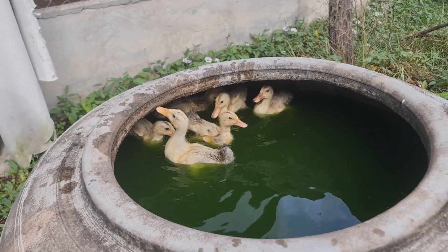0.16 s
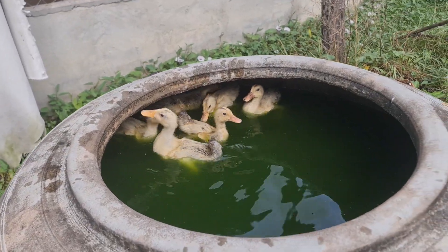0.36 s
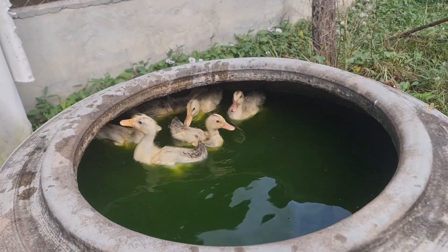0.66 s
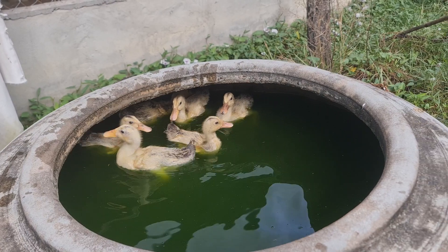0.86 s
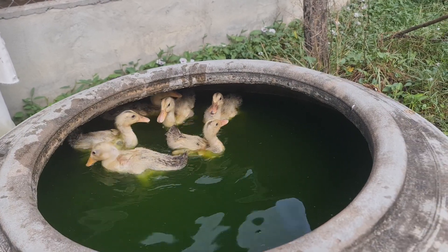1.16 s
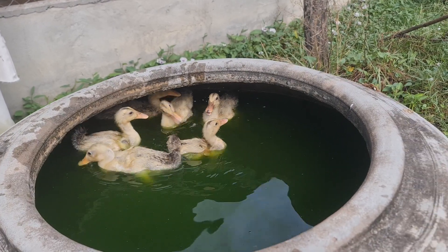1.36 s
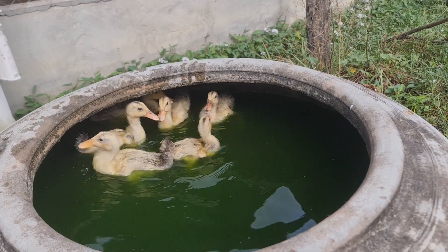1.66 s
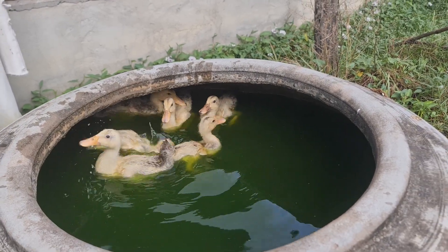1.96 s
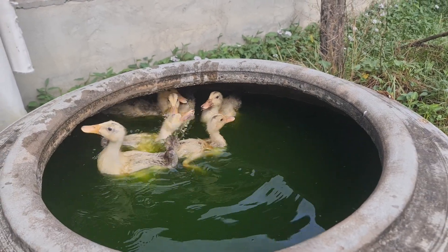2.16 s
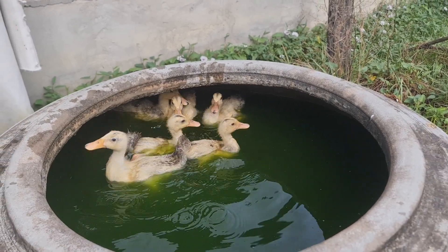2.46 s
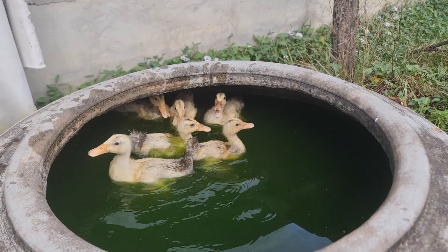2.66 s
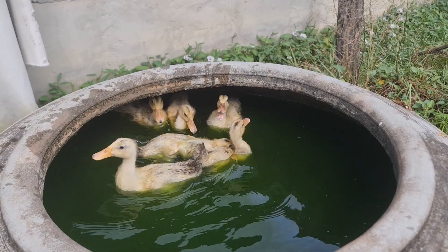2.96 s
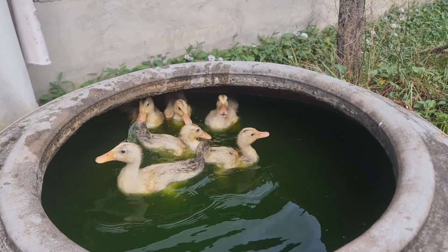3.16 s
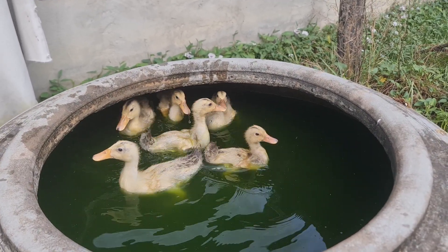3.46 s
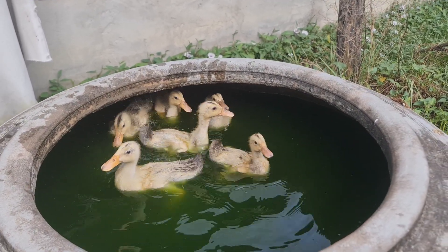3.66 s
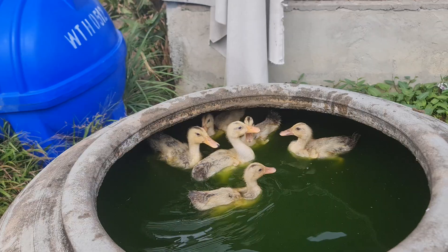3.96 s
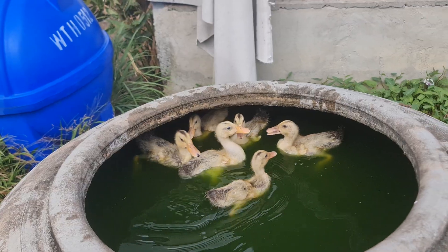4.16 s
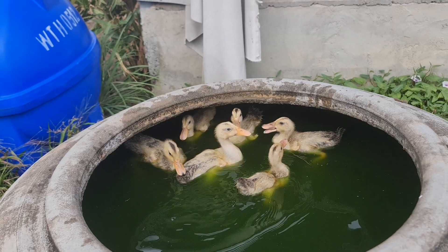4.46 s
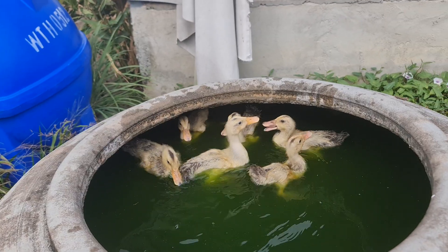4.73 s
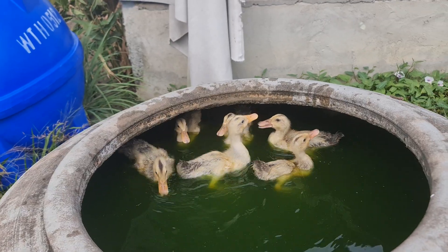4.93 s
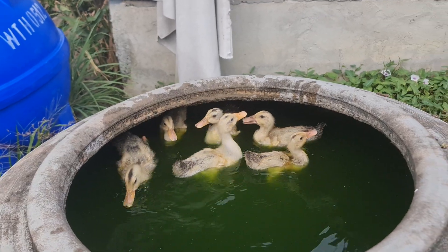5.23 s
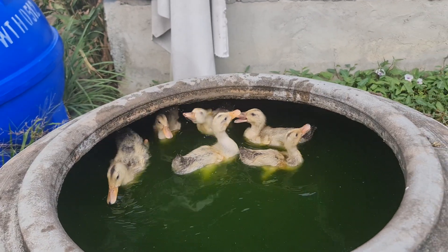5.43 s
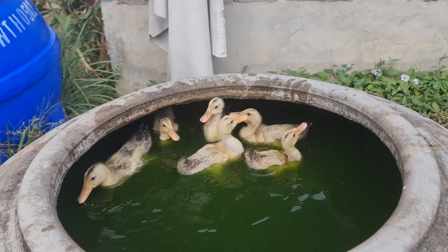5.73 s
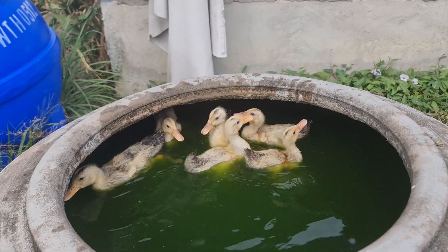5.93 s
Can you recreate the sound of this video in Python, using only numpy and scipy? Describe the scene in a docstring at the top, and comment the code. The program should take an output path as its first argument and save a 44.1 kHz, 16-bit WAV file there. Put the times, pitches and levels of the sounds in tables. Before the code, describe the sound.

Close in stereo, bright short duckling peeps repeat evenly, leaning left, with a short hollow echo from the jar. Small dabs, bubbles and splashes surround them over soft air, low rumble and a far engine. The peeps peak before a momentary silence near four seconds; afterwards they resume softer, answered by higher two-toned whistles, with one soft hollow knock near the end.

```python
"""A yard with a big water jar, its rim concrete: a duckling inside peeps about three times a second.
A second one joins in with two-voiced arching whistles; the others dabble, splash and knock close by.
Peeps are sine partials bent by membrane slips; water is noise bursts and ringing air; the jar is a decaying echo.
Far off, an engine hums and machines drone under coloured noise for the air, with two swells of hiss.
In the stereo microphone sound, everything drops out for a moment just before the fourth second."""
import sys
import numpy as np
from scipy import signal
from scipy.fft import rfft, irfft, next_fast_len
from scipy.io import wavfile
from scipy.ndimage import uniform_filter1d, minimum_filter1d, map_coordinates

SR = 44100
rng = np.random.default_rng(int(sys.argv[2]) if len(sys.argv) > 2 else 0)


def persist_wave(psi):
    """Save psi, clipped to +-1, as 16-bit WAV."""
    counts = np.round(np.clip(psi, -1, 1) * 32767).astype(np.int16)
    wavfile.write(sys.argv[1], SR, np.atleast_2d(counts).T)


N = 268569  # length in samples


def amp(db):
    """Decibels to gain."""
    return 10 ** (np.asarray(db) / 20)


def unit(x):
    """Scale to rms 1."""
    return x / np.sqrt(np.mean(x ** 2) + 1e-20)


def along(points, hz):
    """Read (f/Hz, value) points on a log frequency axis."""
    f, v = np.transpose(points)
    return np.interp(np.log(hz + 1), np.log(f + 1), v)


def curves(rows, t):
    """Each column after the time, read at the times t."""
    s, *cols = np.transpose(rows)
    return [np.interp(t, s, c) for c in cols]


def clock(seconds):
    """Sample times from zero."""
    return np.arange(int(seconds * SR)) / SR


def ramp(t, start, length):
    """Rise from 0 to 1 over length seconds from start."""
    return np.clip((t - start) / length, 0, 1)


def wobble(t, rate):
    """A smooth random curve, rate knots a second."""
    u = (t - t[0]) * rate
    return map_coordinates(rng.standard_normal(int(u[-1]) + 4), [u])


def filtered(x, response):
    """Apply a gain that depends on frequency."""
    n = x.shape[-1]
    m = next_fast_len(n + 8192)
    return irfft(rfft(x, m) * response(np.fft.rfftfreq(m, 1 / SR)), m)[..., :n]


def cycle(hz):
    """Running phase of a pitch curve, in radians."""
    return 2 * np.pi * np.cumsum(hz) / SR


def sides(pan_db):
    """Left and right gains of equal total power, pan_db apart."""
    return unit(amp([[pan_db / 2], [-pan_db / 2]]))


def add(out, s, x):
    """Mix x into out from time s."""
    i = max(round(s * SR), 0)
    out[:, i:i + x.shape[-1]] += x[..., :N - i]


# Likeness of the left and right microphones: f/Hz, correlation from -1 to 1
STEREO_LIKENESS = [(60, 0.98), (180, 0.94), (550, -0.17), (1650, -0.26), (4970, -0.012), (15000, -0.16)]


def noise(spectrum, size):
    """Coloured stereo noise of rms 1; mid and side shares set how alike the two channels are."""
    def colour(hz):
        turn = np.arccos(np.clip(along(STEREO_LIKENESS, hz), -1, 1)) / 2
        return amp(along(spectrum, hz)) * np.array([np.cos(turn), np.sin(turn)])

    mid, side = filtered(rng.standard_normal((2, size)), colour)
    return unit(np.array([mid + side, mid - side]))


# Faint drone of distant machinery: f/Hz, level/dB
MACHINE_TONES = [(335, -82.5), (405, -75.5), (498, -79.5), (592, -72), (856, -86)]


def drone():
    """Thin machine tones from far away, unsteady in pitch and level."""
    t = np.arange(N) / SR
    out = 0
    for hz, db in MACHINE_TONES:
        tone = np.sin(cycle(hz + 14 * wobble(t, 67)))
        out = out + amp(db + 1.3 * wobble(t, 2.7)) * tone
    return out


SWELL_SHAPE = 1.2  # 1 is a pointed swell, 2 a round one


def swell(t, peak, width):
    """A gain that rises to 1 at peak and falls again."""
    return np.exp(-np.abs((t - peak) / width) ** SWELL_SHAPE)


# The far engine's firing rate: t/s, f/Hz
ENGINE_FIRING = [(0, 85), (.5, 82), (2.8, 81.8), (4.15, 80.5), (4.5, 82.6), (5.6, 81.8), (6, 78.5)]
# Swells of its hum, before a common trim: peak t/s, half width t/s, level/dB
ENGINE_SWELLS = [(.53, 0.057, -32), (.97, 0.062, -33), (2.79, 0.05, -29.5), (4.18, 0.045, -28),
                 (4.32, 0.16, -32), (4.662, 0.14, -35), (5.21, 0.21, -33), (6.01, .045, -28)]
IDLE_DB = -57  # the hum between swells, before the same trim
# Bed of the yard, before trims: t/s, rumble level/dB, air level/dB
YARD_LEVELS = [(0.0, -49, -64.5), (0.2, -52.5, -66.5), (1.0, -44, -66.5), (1.63, -47.5, -68),
               (2.61, -48.5, -66.5), (2.95, -44.5, -64), (3.88, -49, -68), (4.04, -43.5, -58.5),
               (4.22, -44.5, -57.5), (4.49, -45.5, -65), (4.94, -52, -60.5), (5.17, -45.5, -60.5),
               (5.6, -48.5, -64.5), (6.09, -40.5, -61)]
RUMBLE_DB, AIR_DB = 0, 6.5  # trims on those two levels
# Colour of the low rumble: f/Hz, relative level/dB per Hz
RUMBLE_COLOUR = [(13, -55), (22, -24.5), (41, -3), (75, 5), (92, -5.5), (108, 0), (140, -8), (172, -26.5),
                 (260, -34.5), (340, -58.5), (570, -120)]
# Colour of the open air: f/Hz, relative level/dB per Hz
AIR_COLOUR = [(110, -27.5), (180, 0), (247, -6.5), (379, -9), (440, -6), (878, -10.5), (1750, -16.5),
              (2450, -14.5), (2790, -13), (3180, -16.5), (4200, -16.5), (5260, -23), (9370, -31.5),
              (11100, -20.5), (15500, -48.5)]
# Swells of hiss: peak t/s, half width t/s, body level/dB, fizz level/dB
HISS_SWELLS = [(1.15, .1, -56.5, -53), (4.238, 0.11, -36.5, -58)]
# Colour of the hiss body: f/Hz, relative level/dB per Hz
HISS_BODY_COLOUR = [(150, -24.5), (400, 11), (1000, -9), (3000, 13), (5000, 0.5), (7500, -12.5),
                    (9500, -25.5), (12000, -7.5), (15500, -21.5)]
# Colour of the high, thin part of the hiss: f/Hz, relative level/dB per Hz
FIZZ_COLOUR = [(2000, -11), (5500, 3.5), (8000, -1), (9700, -9.5), (12000, 0), (15500, -10.5)]
HISS_GRAIN_DB = 2.5  # graininess of the hiss body


def yard():
    """A far engine's hum as a wavering sine at its firing rate; rumble, air and hiss as coloured noise."""
    t = np.arange(N) / SR
    hum_hz, = curves(ENGINE_FIRING, t)
    load = amp(IDLE_DB) + sum(amp(db) * swell(t, s, width) for s, width, db in ENGINE_SWELLS)
    hum = load * amp(-2.0 + wobble(t, 23)) * np.sin(cycle(hum_hz + 1.5 * wobble(t, 22)))
    rumble_db, air_db = curves(YARD_LEVELS, t)
    rumble = amp(rumble_db + RUMBLE_DB + wobble(t, 6.2)) * noise(RUMBLE_COLOUR, N)
    air = amp(air_db + AIR_DB + 1.2 * wobble(t, 15)) * noise(AIR_COLOUR, N)
    body = amp(HISS_GRAIN_DB * wobble(t, 180)) * noise(HISS_BODY_COLOUR, N)
    fizz = noise(FIZZ_COLOUR, N)
    hiss = 0
    for s, width, body_db, fizz_db in HISS_SWELLS:
        hiss = hiss + swell(t, s, width) * (amp(body_db) * body + amp(fizz_db) * fizz)
    return (hum + rumble + air + hiss) * sides(-1.8)


# Faint chirps from farther off: start t/s, length t/s, from f/Hz, to f/Hz, level/dB
FAR_CHIRPS = [(0.016, 0.57, 4630, 3460, -69), (0.222, 0.11, 3160, 2610, -59.5),
              (.45, 0.25, 3170, 2730, -62), (0.502, 0.16, 4680, 4200, -69), (0.939, .08, 3960, 4180, -53.5),
              (5.27, 0.074, 4620, 4030, -53.5)]


def chirps():
    """Thin distant glides: single sines, shaky in pitch, fading in and out."""
    out = np.zeros((2, N))
    for s, length, from_hz, to_hz, db in FAR_CHIRPS:
        t = clock(length)
        hz = np.linspace(from_hz, to_hz, len(t)) + 130 * wobble(t, 400)
        level = amp(db + 1.4 * wobble(t, 58)) * signal.windows.tukey(len(t), .5)
        add(out, s, level * np.sin(cycle(hz)))
    return out


def dabbling(count):
    """Paddling feet and bills scatter tiny bubbles, each a short sine rising in pitch."""
    out, t = np.zeros((2, N)), clock(0.036)
    for when, pitch, size, side in rng.random((count, 4)):
        hz = 1100 * 4.5 ** pitch
        level = amp(-59.0 + 9.5 * size ** 3) * np.exp(-t * hz / 6)  # higher bubbles die sooner
        bubble = level * np.sin(cycle(hz * (1 + 5 * t)))
        add(out, when * N / SR, bubble * sides(8 * side - 5))
    return out


KNOCK_S = 5.617
# Modes of a hollow knock: f/Hz, relative level/dB, t60/s
KNOCK_MODES = [(342, 2, 0.26), (497, 4, 0.14), (637, 4, 0.15), (684, -15, 0.26), (1400, -13, 0.049)]


def knock():
    """One soft hollow knock: a few modes ring and decay together."""
    out, t = np.zeros((2, N)), clock(.4)
    ring = sum(amp(db - 60 * t / t60) * np.sin(2 * np.pi * hz * t) for hz, db, t60 in KNOCK_MODES)
    add(out, KNOCK_S, amp(-38.0) * ring * (1 - np.exp(-t / 0.0017)) * sides(-3.0))
    return out


# Bill dabs and splashes, before trims: t/s, level/dB, low slap relative level/dB, t60/s
SPLASH_EVENTS = [(0.3316, -47, -17, 0.088), (0.4518, -50.5, 2, 0.07), (0.6459, -57.5, 14, 0.1),
                 (0.8485, -44.5, 3.5, 0.089), (0.9353, -56, 5, 0.13), (1.3018, -35, -18, 0.038),
                 (1.66, -46.5, -24, 0.037), (1.9989, -47, 8, 0.07), (2.277, -40.5, -21, 0.031),
                 (3.0898, -49.5, 3, 0.092), (3.1236, -23.5, 0.5, 0.11), (3.2118, -45, -13.5, 0.074),
                 (3.2319, -35, -10, 0.096), (3.763, -44.5, -16.5, 0.04), (4.6925, -39, -16, 0.046),
                 (5.216, -39, -44, 0.059)]
# Colour of the spray, also the breath in a peep: f/Hz, relative level/dB per Hz
SPRAY_COLOUR = [(1200, -27), (2500, -1.5), (4400, 0.5), (6500, -10), (9500, -27), (15000, -24.5)]
# Colour of the low slap: f/Hz, relative level/dB per Hz
SLAP_COLOUR = [(300, -19), (750, 0.5), (1300, 2), (2000, -2), (4000, -33.5)]
# Air pockets in the water: t/s, starting f/Hz, level/dB, t60/s, pitch rise as a share per second
AIR_POCKETS = [(0.276, 336, -50.5, 0.14, 1), (2.002, 700, -35, 0.086, 4), (2.006, 1162, -38, 0.057, 1.5),
               (2.077, 583, -30, 0.12, 3), (2.078, 1110, -31.5, 0.023, 0), (2.129, 1207, -33.5, .045, 16.5),
               (3.131, 1345, -21.5, 0.042, 3.5), (3.125, 757, -34.5, 0.059, 4)]


def water():
    """Splashes are a slap under grainy spray; trapped air rings at a steady or rising pitch."""
    out, t = np.zeros((2, N)), clock(0.19)
    for s, db, slap_db, t60 in SPLASH_EVENTS:
        burst = amp(-4.0) * noise(SPRAY_COLOUR, len(t)) + amp(slap_db - 5) * noise(SLAP_COLOUR, len(t))
        decay = amp(db - 60 * t / t60 + 4.3 * wobble(t, 600))
        add(out, s - .002, burst * decay * (1 - np.exp(-t / 0.00077)))
    for s, hz, db, t60, rise in AIR_POCKETS:
        level = amp(db - 60 * t / t60) * (1 - np.exp(-t / 0.0018))
        add(out, s, level * np.sin(cycle(hz * (1 + rise * t))) * sides(-6))
    return out


# The second duckling, before trims: start t/s, length t/s,
# lower voice from f/Hz, to f/Hz, upper voice from f/Hz, to f/Hz, level/dB
WHISTLE_NOTES = [(4.296, .055, 2870, 3105, 2976, 3130, -31), (4.821, 0.097, 3100, 2920, 3770, 3720, -33.5),
                 (5.067, 0.098, 3750, 3610, 4210, 4060, -29), (5.438, 0.15, 3195, 3786, 3830, 4430, -28.5),
                 (5.784, 0.146, 3390, 4170, 4135, 4550, -30)]
WHISTLE_ENTRY_HZ, WHISTLE_SETTLE_S = 544, 0.0117  # a whistle dips onto its glide from above
WHISTLE_ATTACK_S, WHISTLE_ONSET_DB, WHISTLE_FADE_DB = 0.034, -13, -5.5
# every whistle plunges towards the same two pitches
WHISTLE_DROP_S, WHISTLE_END_HZ, WHISTLE_END_GAP_HZ = .045, 2800, 438


def whistles():
    """The two sides of a syrinx glide separately and plunge together, with weak sum and difference tones."""
    out = np.zeros((2, N))
    for s, length, low_from_hz, low_to_hz, high_from_hz, high_to_hz, level_db in WHISTLE_NOTES:
        t, crest = clock(length), max(length - WHISTLE_DROP_S, length / 10)
        glide, drop = ramp(t, 0, crest), ramp(t, crest, WHISTLE_DROP_S) ** 2
        high_end_hz = WHISTLE_END_HZ + WHISTLE_END_GAP_HZ
        low_hz = low_from_hz + (low_to_hz - low_from_hz) * glide + (WHISTLE_END_HZ - low_to_hz) * drop
        high_hz = high_from_hz + (high_to_hz - high_from_hz) * glide + (high_end_hz - high_to_hz) * drop
        onset_db = WHISTLE_ONSET_DB * (1 - ramp(t, 0, WHISTLE_ATTACK_S))
        db = level_db + onset_db + WHISTLE_FADE_DB * drop
        lead = np.array([[-.9], [.9]])  # radians: the right microphone hears this bird a little sooner
        entry_hz = WHISTLE_ENTRY_HZ * np.exp(-t / WHISTLE_SETTLE_S)
        low, high = [cycle(uniform_filter1d(hz + entry_hz, size=500) + 24 * wobble(t, 1000)) + lead
                     for hz in (low_hz, high_hz)]
        low_voice = amp(2.2 * wobble(t, 85.0)) * np.sin(low)
        high_voice = amp(-5.5 + 2.8 * wobble(t, 44.7)) * np.sin(high)
        voice = low_voice + high_voice + amp(-24) * np.sin(2 * low - high)
        # powers of the blended voices give the sum tones and harmonics
        blend = np.sin(low) + np.sin(high) + 0.063 * wobble(t, 3000)
        overtones = amp(-17.5) * blend ** 2 + amp(-35.5) * blend ** 3
        overtones = filtered(overtones, lambda hz: hz > 5500)
        level = amp(db + 4 + wobble(t, 105)) * signal.windows.tukey(len(t), .12)
        add(out, s, level * (voice * sides(-8.0) + overtones))
    return out


FLICK_S, FLICK_FROM_HZ, FLICK_TOP_HZ, FLICK_DB = .02, 3300, 3846, -14.5  # soft upward flick before a note
ENTRY_HZ, SETTLE_S = 177, .006  # the note starts this far above its course and settles
SAG_SHARE, SAG_DEPTH, RECOVERY = .42, 2.1, 0.37  # lowest this far in; start and end height, in sags
BREAK_S, BREAK_HZ, BREAK_DB = .028, 2192, -32.5  # how long, how low and how soft a note breaks off
ATTACK_S = .005


def peep_pitch(t, length, pitch_hz, sag_hz):
    """Flick up, sag onto the note, recover a little, then drop; t runs from the note's start."""
    u = ramp(t, 0, length)
    sag = SAG_DEPTH * (1 - ramp(u, 0, SAG_SHARE)) ** 2 + RECOVERY * ramp(u, SAG_SHARE, 1 - SAG_SHARE)
    note = pitch_hz + sag_hz * sag + ENTRY_HZ * np.exp(-np.abs(t) / SETTLE_S)
    start_hz = pitch_hz + SAG_DEPTH * sag_hz + ENTRY_HZ
    flick = np.interp(t, [-FLICK_S, -FLICK_S / 2, 0], [FLICK_FROM_HZ, FLICK_TOP_HZ, start_hz])
    held = (1 - ramp(t, length - .003, BREAK_S)) ** 2
    return np.where(t < 0, flick, BREAK_HZ + (note - BREAK_HZ) * held)


def peep_gate(t, length):
    """Soft flick, quick attack, hold and release, in dB."""
    opening_db = -22 * (1 - ramp(t, -FLICK_S, .006))
    attack_db = FLICK_DB * (1 - ramp(t, -ATTACK_S / 2, 1.44 * ATTACK_S))
    return opening_db + attack_db + BREAK_DB * ramp(t, length + 0.0043, BREAK_S)


def slips(t, start, stop, rate, width):
    """Brief, nearly regular breaks of the syrinx vibration, as bumps of height about 1."""
    steps = np.cumsum(np.r_[0, rng.uniform(.86, 1.14, 24)])
    times = start + steps / (rate * rng.uniform(.9, 1.1))
    heights = rng.uniform(.85, 1.1, times.shape) * (times < stop)
    return heights @ np.exp(-((t - times[:, None]) / width) ** 2)


# The main duckling, before trims: start t/s, length t/s, pitch f/Hz, sag onto that pitch f/Hz, level/dB,
# growth over the note/dB, rasp from and to as shares of the length (no rasp if to comes before from),
# overtone level/dB, left minus right level/dB, lead of the left microphone/ms
PEEP_NOTES = [(1.193, 0.071, 2475, 192, -24.5, 5, 0.17, .3, -43.5, -4, 0.071),
              (1.453, 0.089, 2615, 220, -19, 0, 0.1, .46, -36, -4, 0.081),
              (1.736, 0.092, 2657, 214, -16, 2, 0.15, .47, -40.5, -4.5, 0.13),
              (2.047, 0.087, 2820, 60, -17, 1.5, 0.16, .95, -39, -1.5, 0.11),
              (2.34, 0.1, 2663, 220, -18.5, 5.5, 0.62, 0.98, -38, -7, .13),
              (2.636, 0.11, 2803, 79.5, -17.5, 5, 0.34, 0.94, -40, -7, .13),
              (2.948, 0.1, 2870, 10, -15.5, 5.5, .3, 1, -38, -7.5, 0.13),
              (3.245, 0.11, 2817, 20.5, -12.5, 2, 0.26, 0.015, -39.5, -13.5, -0.12),
              (3.556, 0.12, 2843, -41, -19, 3, .26, 0.65, -43, -6.5, -.14),
              (3.872, 0.099, 2797, -29.5, -14, 8, .43, .67, -34.5, -10.5, -.11),
              (4.195, 0.087, 2410, 151.5, -26.5, 7, 0.037, 0.23, -50, -8, -.09),
              (4.49, .093, 2565, 59, -20.5, 4, .17, .33, -38.5, -12, -0.03),
              (4.77, 0.1, 2690, 155, -21.5, 1.5, 0.27, 1, -39.5, -8, .14),
              (5.068, 0.1, 2690, 93, -22.5, 1, 0.11, 1, -40, -11, 0.042),
              (5.373, 0.1, 2698, 160, -21.5, 6.5, 0.19, 0.92, -41.5, -10, -.12),
              (5.674, 0.1, 2690, 161.5, -21, -1, .34, 1, -40.5, -8, .13),
              (5.988, 0.096, 2640, 170, -20, 1.5, 0.11, 0.65, -40.5, -6, .13)]
# Upper partials against the second: multiple of the pitch, relative level/dB
PEEP_OVERTONES = [(2, -4), (3, -17.5), (4, -24.5), (5, -23)]
# Bill and throat pass a band near each partial and ring just above the note: f/Hz, gain/dB
THROAT_GAIN = [(1500, -17.5), (2100, -10), (2500, 0.5), (2850, 0), (3130, 5), (3450, -3.5), (3800, -1.5),
               (4400, 4), (5200, 3), (6200, -1.5), (7200, 2), (8100, 2.5), (8700, -5), (9700, -14),
               (10800, -6), (15000, -10)]
FLUTTER_DB, RASP_FLUTTER_DB = 0.25, 1.73  # unsteady level, more so in the rasp
SLIP_RATE, SLIP_CYCLES, SLIP_SHRINK = 110, 0.634, .15  # slips/s; cycles gained in each, less in a long rasp
BLOOM_DB = 5.5  # the clearer a note, the more it blooms in the middle


def peeps():
    """Each peep flicks up, settles on a held note, may rasp, and drops in pitch as it breaks off."""
    out = np.zeros((2, N))
    slip_s = .00095
    t = clock(.18) - .025  # zero is the note's start, after the flick
    for (s, length, pitch_hz, sag_hz, db, growth_db, rasp_from, rasp_to,
         over_db, pan_db, lead_ms) in PEEP_NOTES:
        rasp0, rasp1, rasp_share = rasp_from * length, rasp_to * length, rasp_to - rasp_from
        gate_db, u = peep_gate(t, length), ramp(t, 0, length)
        bloom_db = BLOOM_DB * (1 - rasp_share) ** 2 * (np.sin(np.pi * u) - 2 / np.pi)
        level_db = db + growth_db * (u - .5) + bloom_db
        # the membranes slip through the rasp, and again as the note breaks off
        slip = slips(t, rasp0, rasp1, SLIP_RATE, slip_s)
        slip = slip + slips(t, length + .003, length + BREAK_S, 170, slip_s)
        loose = 1 - amp(gate_db)
        rasp = uniform_filter1d(1. * (t > rasp0) * (t < rasp1), size=200)
        # pitch wavers slowly, and faster where the note is loose or raspy
        hz = uniform_filter1d(peep_pitch(t, length, pitch_hz, sag_hz), size=130)
        hz = hz + 10 * wobble(t, 90) + (7 + 130 * loose + 30 * rasp) * wobble(t, 600)
        phase = cycle(hz) + np.pi * pitch_hz * lead_ms / 1000 * np.array([[1], [-1]])
        # a slip nearly stops the note and restarts it out of step
        jolt = cycle((SLIP_CYCLES - SLIP_SHRINK * rasp_share) * slip / (slip_s * np.sqrt(np.pi)))
        flutter_db = (FLUTTER_DB + RASP_FLUTTER_DB * rasp) * wobble(t, 108.4)
        # each restart in the rasp pings the throat a little above the note
        ping_level = .55 * np.roll(uniform_filter1d(slip, size=90), 70) * rasp
        ping = ping_level * np.sin(phase + 2 * np.pi * 300 * t)
        voice = (1 - .9 * slip) * np.sin(phase + jolt) + ping
        note = amp(level_db + flutter_db) * sides(pan_db) * voice
        # the rasp also sharpens the waveform; the highest partials are the most ragged
        edge = 0
        for k, partial_db in PEEP_OVERTONES:
            ragged = k * (.11 + .16 * rasp) * wobble(t, 700)
            partial = np.sin(round(k) * phase + jolt + ragged)
            edge = edge + amp(partial_db + 2 * wobble(t, 60)) * partial
        edge = edge * amp(over_db - 3.5 + 6.5 * slip + rasp * (0.8 + 3.7 * wobble(t, 680)))
        turbulence = amp(over_db - 23.5 + 3 * slip + 18 * loose) * noise(SPRAY_COLOUR, len(t))
        sounding = (t > -FLICK_S) * (t < length + BREAK_S)
        add(out, s + t[0], np.sqrt(2) * amp(gate_db) * sounding * (note + edge + turbulence))
    return filtered(out, lambda hz: amp(along(THROAT_GAIN, hz)))


def echo(x, t60, delay):
    """A diffuse decaying answer of random reflections, different at each microphone."""
    t = clock(.7)
    tail = rng.standard_normal((2, len(t))) * amp(-60 * t / t60) * (t > delay)
    return signal.fftconvolve(x, tail / np.linalg.norm(tail[0]), axes=1)[:, :N]


def scene():
    """The rim answers the near sounds at once, the hollow of the jar lingers; far chirps arrive as echo only."""
    near = peeps() + whistles() + water() + knock()
    centre = np.array([near[0] + near[1]] * 2) / 2
    rim = amp(-19) * echo(near, t60=.05, delay=.002)
    hollow = amp(-19) * echo(centre, t60=0.28, delay=0.0084)
    far = echo(chirps(), t60=0.1, delay=0)
    return near + rim + hollow + far + dabbling(count=150) + drone() + yard()


# The brief dropout; the end values hold before and after: t/s, gain/dB
DROPOUT_GAIN = [(3.954, 2), (3.957, -45), (3.998, -42), (4.001, 1)]
TOP_HZ = 15750  # nothing passes above this


def record(dry):
    """The brief dropout, a limiter on the loudest peaks, then the band limit."""
    gain_db, = curves(DROPOUT_GAIN, np.arange(N) / SR)
    x = dry * amp(gain_db)
    needed = np.minimum(1, .9 / (np.abs(x).max(axis=0) + 1e-9))
    gain = uniform_filter1d(minimum_filter1d(needed, size=600), size=500)
    return filtered(x * gain, lambda hz: hz < TOP_HZ)


dry = scene()
out = record(dry)
persist_wave(out)
```